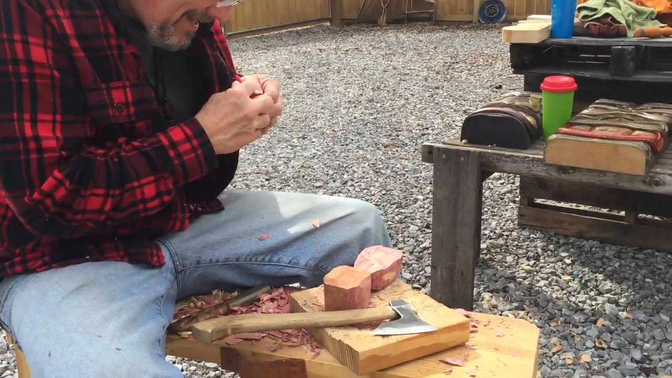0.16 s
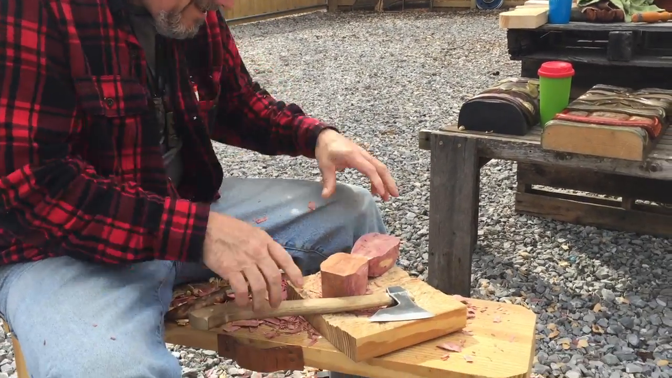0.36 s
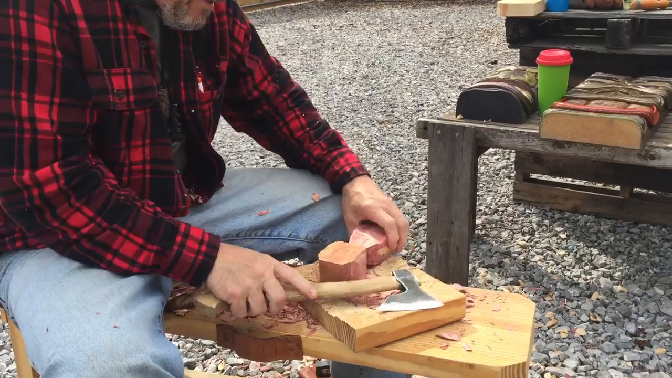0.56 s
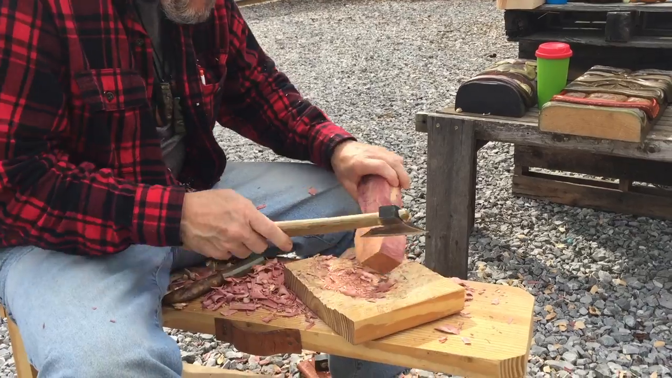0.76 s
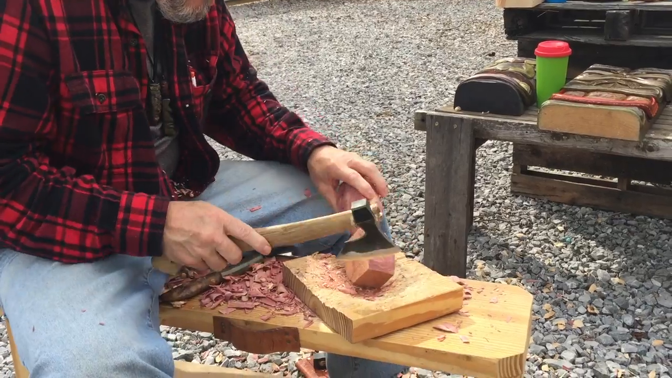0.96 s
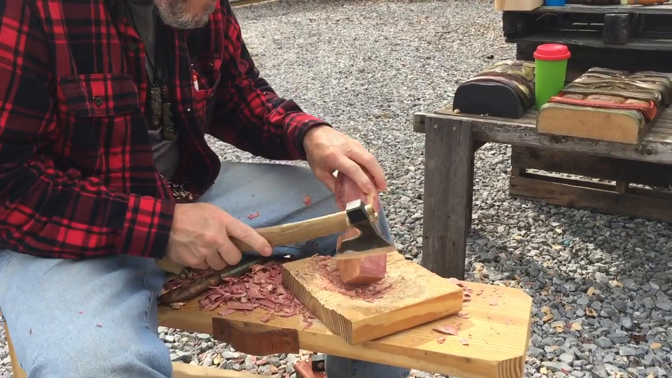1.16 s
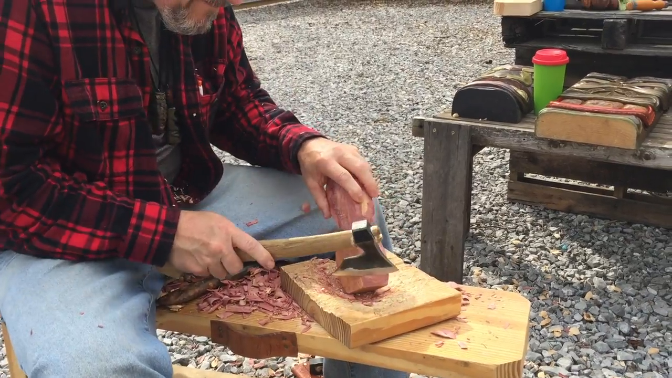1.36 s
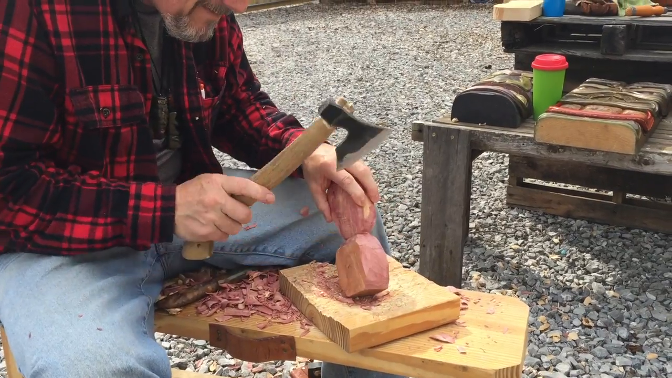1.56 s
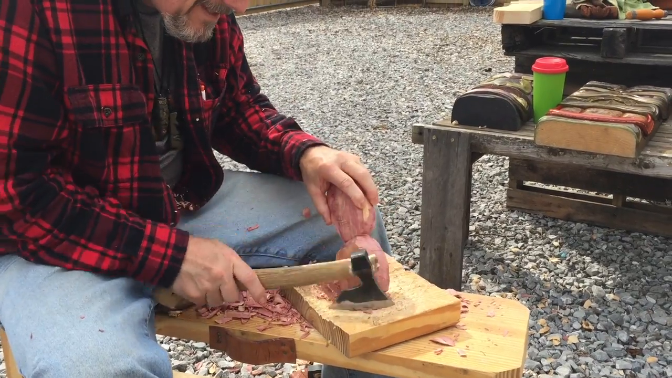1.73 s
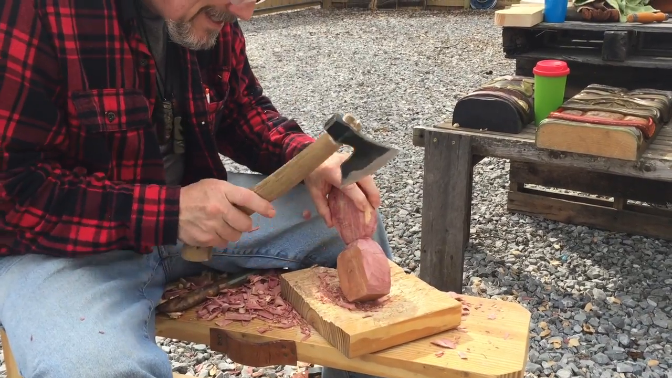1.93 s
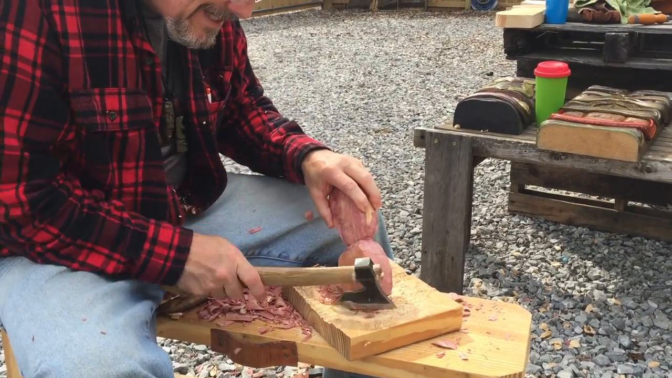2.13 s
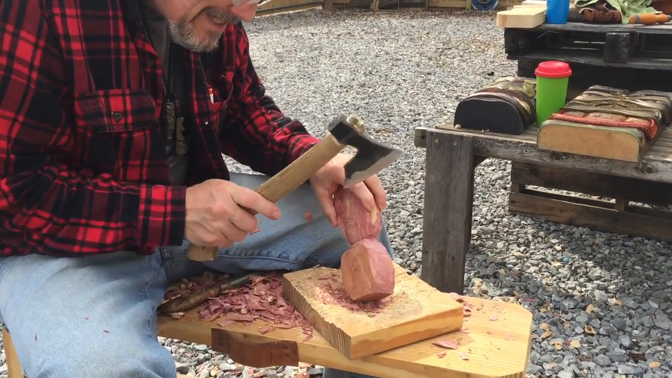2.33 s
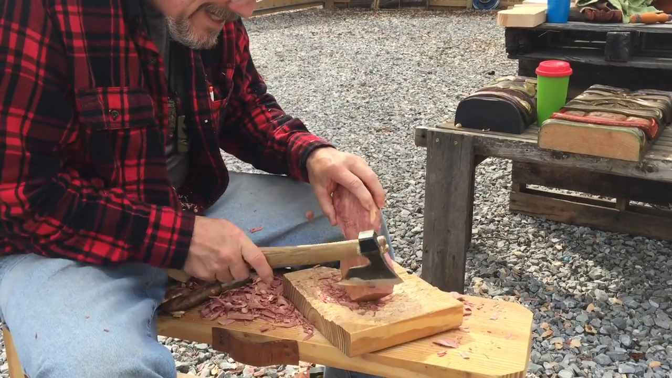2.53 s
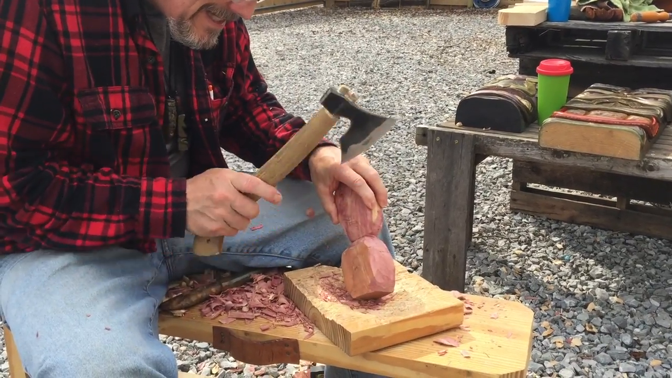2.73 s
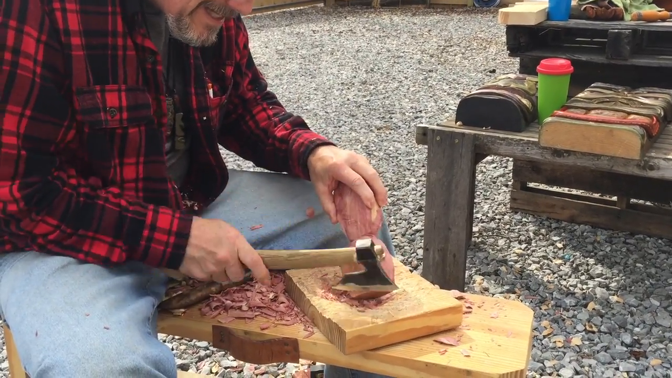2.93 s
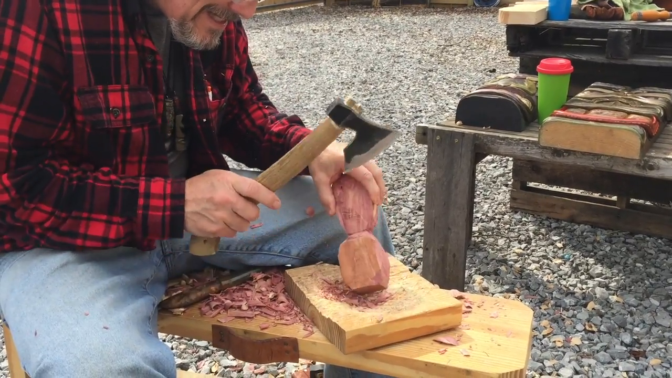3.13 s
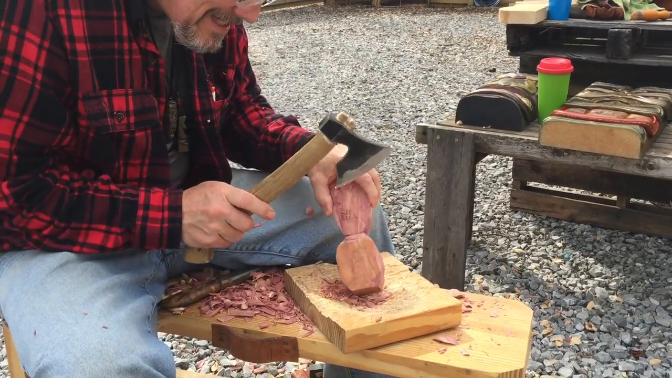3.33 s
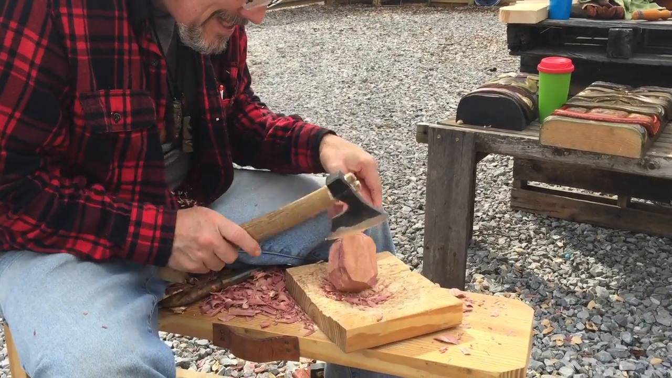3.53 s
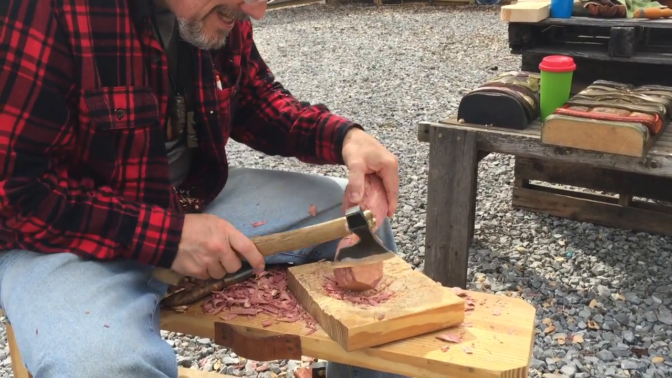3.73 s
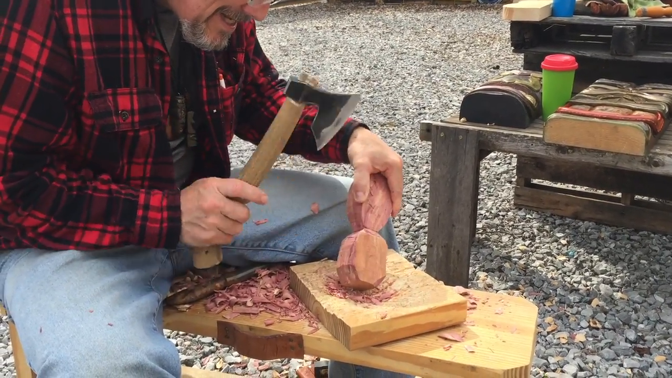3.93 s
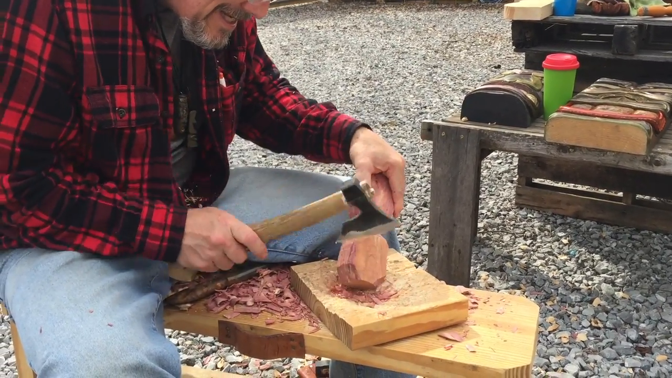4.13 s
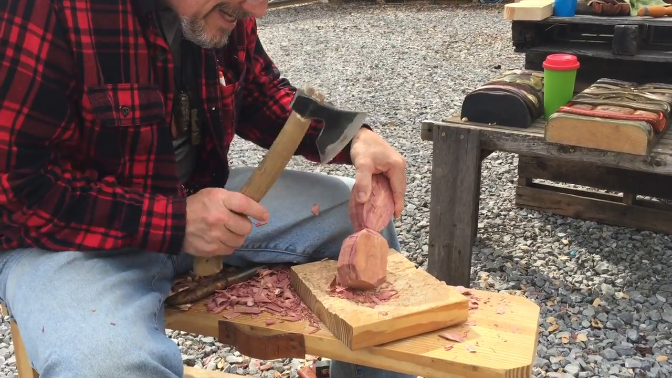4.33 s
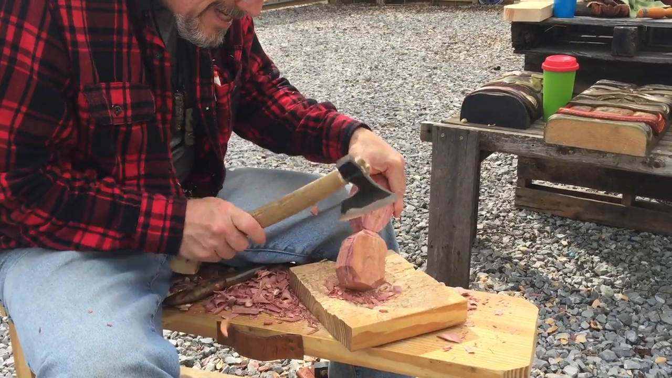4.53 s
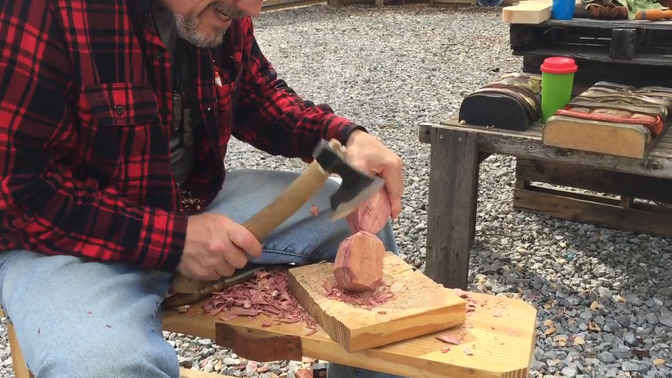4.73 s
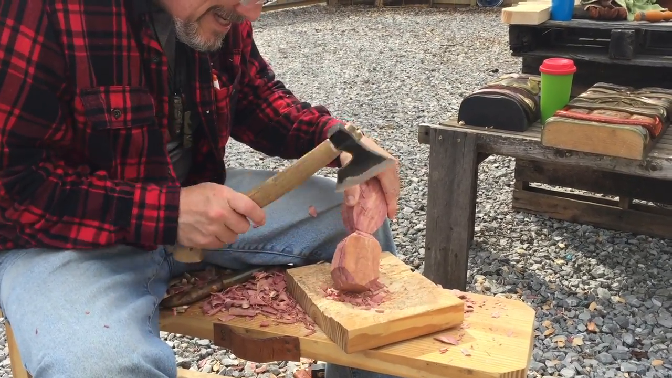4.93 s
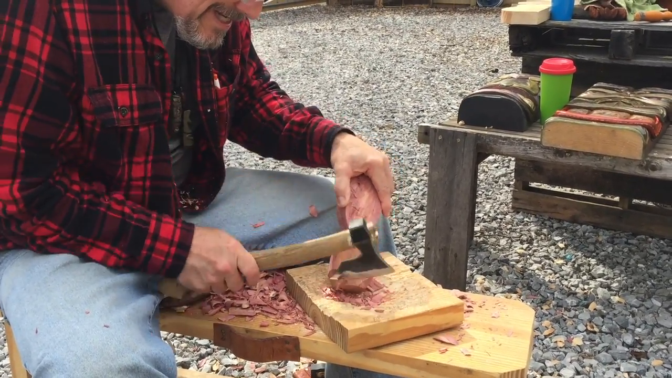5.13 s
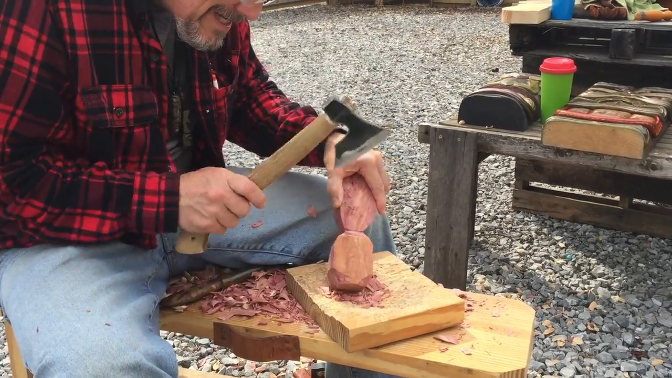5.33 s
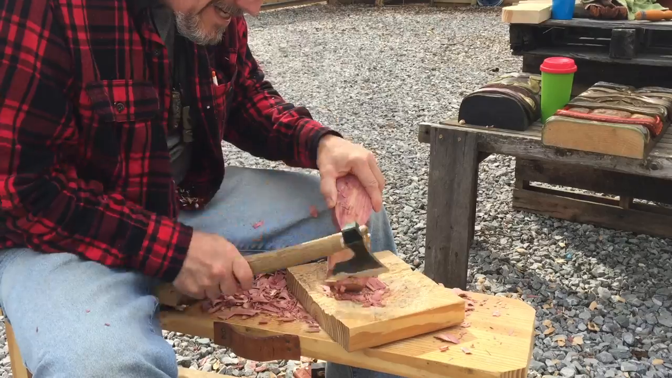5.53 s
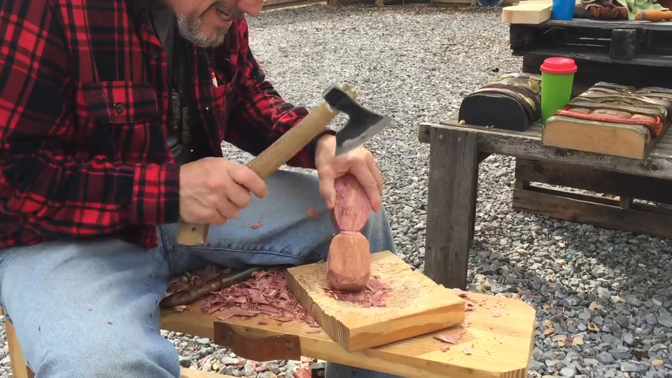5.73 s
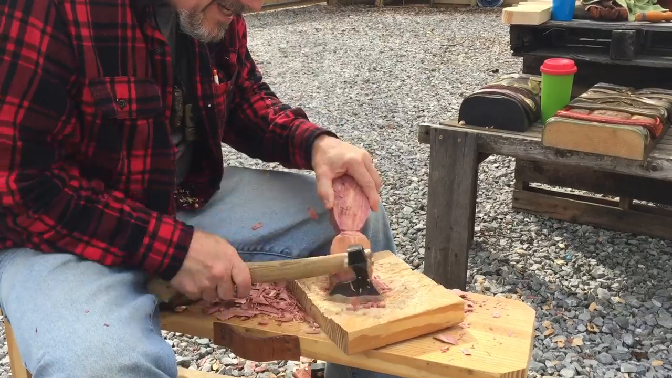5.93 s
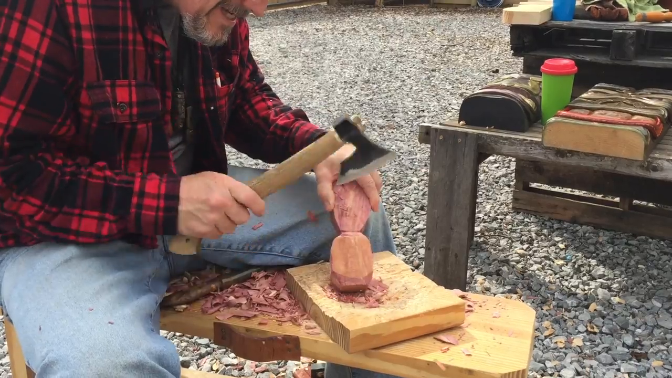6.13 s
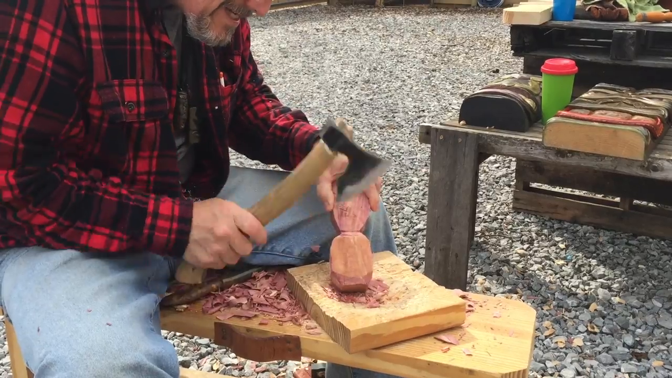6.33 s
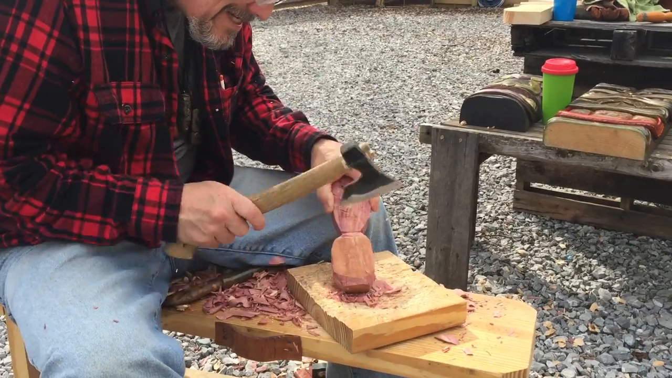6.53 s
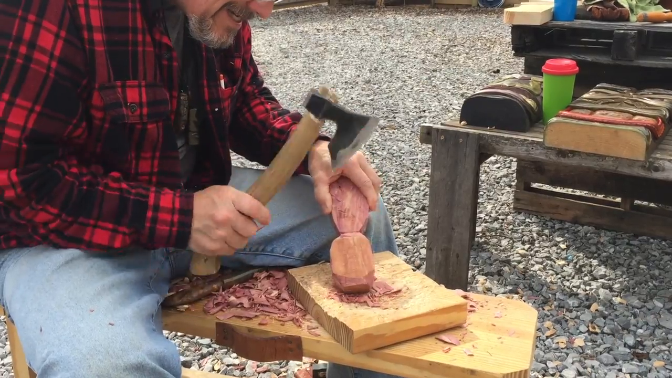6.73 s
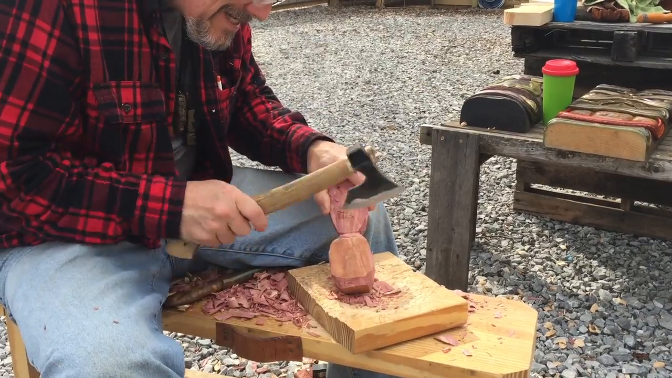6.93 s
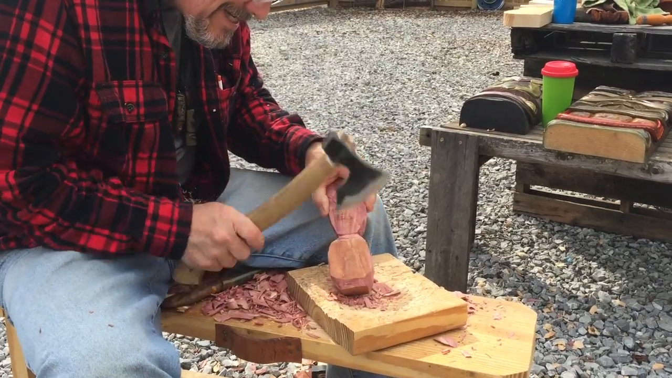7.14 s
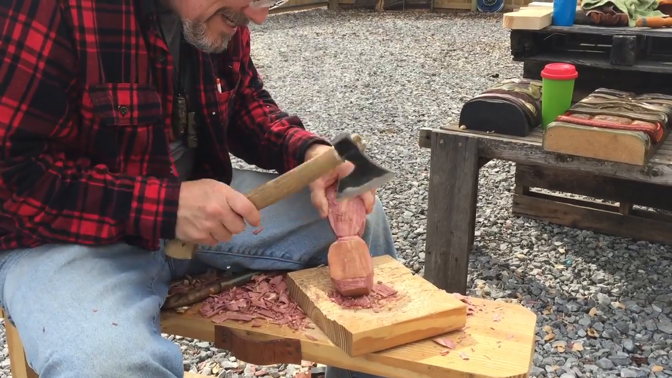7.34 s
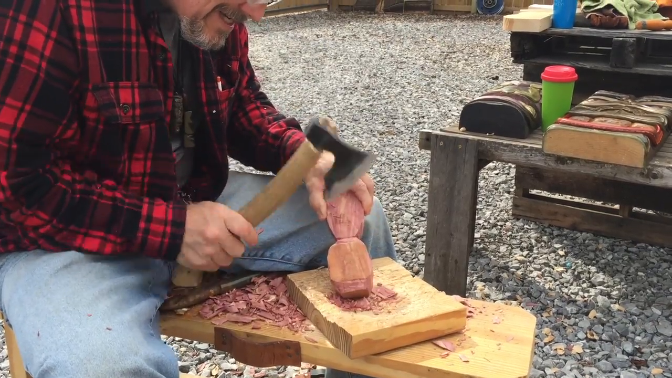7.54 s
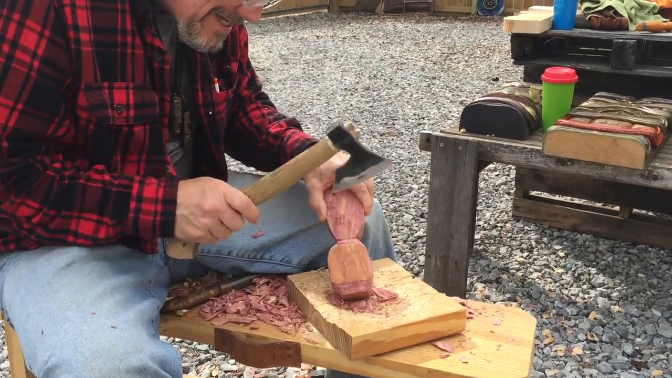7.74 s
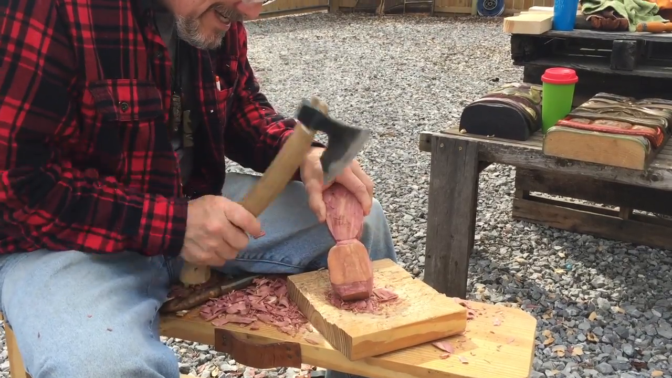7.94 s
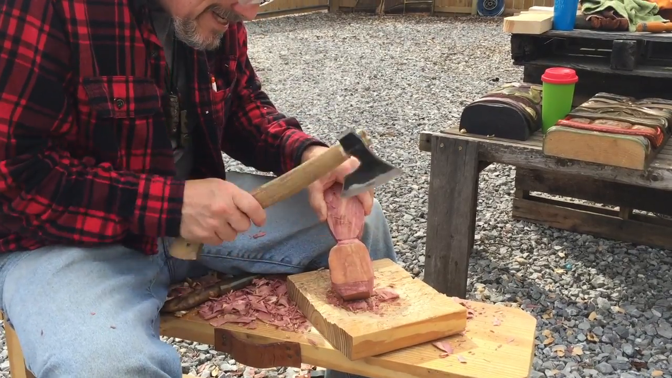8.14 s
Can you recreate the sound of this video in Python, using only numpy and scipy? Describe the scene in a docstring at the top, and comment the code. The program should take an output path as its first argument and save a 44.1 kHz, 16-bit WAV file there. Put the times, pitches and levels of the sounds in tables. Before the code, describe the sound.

After soft handling and rubbing of wood, light hatchet strokes fall in steady rhythm with woody cracks, dull board thumps and faint open-yard echoes.

```python
"""A hatchet chops a wooden blank that stands on a board across a bench, in a fenced gravel yard.
Each contact rings the blank's damped modes, tears fibres as a burst of noise and, a moment later,
thumps the board; the steel head rings briefly and the fences answer with smeared echoes.
Short puffs of noise tick and scuff, hands rub the wood as swelling noise, a far bird whistles in
gliding tones, and traffic rumbles in the distance under a faint hiss. The hardest blows clip."""
import sys
import numpy as np
from scipy import signal
from scipy.fft import rfft, irfft, next_fast_len
from scipy.io import wavfile
from scipy.ndimage import uniform_filter1d, map_coordinates

SR = 44100
rng = np.random.default_rng(int(sys.argv[2]) if len(sys.argv) > 2 else 0)


def convert_level_to_amplitude(level_db):
    """Map a level in decibels to its linear amplitude factor."""
    exponent = np.asarray(level_db, float) / 20
    return 10 ** exponent


def unload_wav(signal):
    """Save mono or channel-first audio to the path in sys.argv[1] as 16-bit WAV at rate SR, clipped to [-1, 1]."""
    wavfile.write(
        sys.argv[1],
        SR,
        np.round(np.clip(np.atleast_2d(signal).T, -1, 1) * 32767).astype(np.int16),
    )


N = 365148  # length of the scene in samples

# The chip being split off at each stroke lends a resonance, and the hatchet head rings; the set-downs have rows
# too. # Each row: time in seconds, chip resonance in Hz, its lift in dB, level of the steel ring in dB.
CHIPS = [(.954, 1490, 0.6, -75), (1.356, 3600, 5.5, -46), (1.844, 1554, 6, -23.5), (2.21, 4140, 4.5, -28),
         (2.589, 5516, 4.5, -37.5), (2.9824, 4583, 0, -18), (3.7671, 2100, 4, -40.5),
         (4.155, 2113, 2, -32.5), (4.5257, 3680, 2.5, -29.5), (4.896, 5460, 2, -21),
         (5.2739, 7010, 6, -39.5), (5.667, 2490, 4.5, -36.5), (6.0688, 2113, 4, -16.5),
         (6.5059, 1800, 2, -28), (6.9146, 2403, 10, -31.5), (7.2986, 2075, 10.5, -36.5),
         (7.7034, 2830, 4.5, -35.5), (8.109, 2343, 5, -39)]


def unit(x):
    """Brings x to rms 1."""
    return x / np.sqrt(np.mean(x ** 2) + 1e-20)


def along(points, hz):
    """Reads a curve of (Hz, value) points at any frequency, on a log axis."""
    f, value = np.transpose(points)[:2]
    return np.interp(np.log(hz + 1), np.log(f + 1), value)


def wobble(rate):
    """A smooth random curve with rate knots a second."""
    knots = rng.standard_normal(int(N * rate / SR) + 4)
    return map_coordinates(knots, [np.arange(N) * rate / SR])


def filtered(x, response):
    """Multiplies the spectrum of x by a response of frequency."""
    m = next_fast_len(len(x) + 8192)
    return irfft(rfft(x, m) * response(np.fft.rfftfreq(m, 1 / SR)), m)[:len(x)]


def noise(spectrum, size):
    """Coloured noise of rms 1."""
    return unit(filtered(rng.standard_normal(size), lambda hz: convert_level_to_amplitude(along(spectrum, hz))))


def dying(colour, decay, seconds, size):
    """Noise of energy 1 in which each frequency dies at its own speed."""
    hz, t, z = signal.stft(rng.standard_normal(round(SR * seconds)), SR, nperseg=size)
    level_db = along(colour, hz)[:, None] - 60 * t / along(decay, hz)[:, None]
    out = signal.istft(z * convert_level_to_amplitude(level_db), SR, nperseg=size)[1]
    return out / np.linalg.norm(out)


def patchy(x, depth_db):
    """Random gain in patches some hundred Hz by some ten ms, brought to rms 1."""
    z = signal.stft(x, nperseg=256)[2]
    field = uniform_filter1d(rng.standard_normal(z.shape), size=3, axis=0)
    field = uniform_filter1d(field, size=12, axis=1)
    return unit(signal.istft(z * convert_level_to_amplitude(depth_db * unit(field)), nperseg=256)[1][:len(x)])


def add(track, s, sound):
    """Mixes a sound in at second s."""
    part = track[round(s * SR):][:len(sound)]
    part += sound[:len(part)]


def tilted(rows, slope_db, pivot_hz):
    """Tilts rows (Hz, dB, ..) by slope_db an octave: a harder contact wakes the higher modes."""
    return [(hz, db + slope_db * np.log2(hz / pivot_hz), *rest) for hz, db, *rest in rows]


def ring(modes, t, scatter_db, cycles, detune):
    """Damped modes, new in strength and pitch each time; each takes some cycles to build up."""
    hz, db, t60 = np.transpose(modes)[:, :, None]
    chance = rng.standard_normal((2, len(modes), 1))
    build_up = 1 - np.exp(-(t * hz / cycles) ** 2)  # so the lows come late
    size = convert_level_to_amplitude(db + scatter_db * chance[0] - 60 * t / t60) * build_up
    return -np.sum(size * np.sin(2 * np.pi * hz * (1 + detune * chance[1]) * t), 0)


def chops():
    """Each contact: knock of the blank, burst of tearing fibres, late thump of the board."""
    # Contacts of the edge, often two to a stroke. Each row: time in seconds, then relative levels
    # of knock, thump and split in dB, and length of the split in ms.
    chop_rows = [(1.844, -18.5, -26.5, -31.5, 9), (1.8570, -4.5, -11, -32, 5.6),
                 (2.21, -10, -19.5, -16, 4.8), (2.2260, -14, -14.5, -32, 2.1),
                 (2.5890, -14.5, -15, -14.5, 3.5), (2.9825, -11, -8.5, -16.5, 2.2),
                 (2.9917, -7, -20.5, -24, 3.5), (4.1550, -18, -28.5, -26.5, 6.6),
                 (4.1660, -5, -11.5, -26.5, 2.2), (4.5262, -14, -13, -15.5, 5.5),
                 (4.8922, -13.5, -22, -21, 4.8), (4.8960, -29, -20.5, -18, 3), (4.906, -8, -13, -27.5, 2.7),
                 (5.2738, -10.5, -9.5, -15.5, 4), (5.6670, -2.5, -7.5, -11, 1.6),
                 (6.0686, -5, -6.5, -14, 2.3), (6.075, -7.5, -6.5, -30.5, 3.5),
                 (6.4994, -13.5, -14.5, -25.5, 6), (6.5059, 0, -7.5, -25, 4.8),
                 (6.9147, -6, -9.5, -14.5, 2.5), (7.2987, -4, -6.5, -17, 1.8),
                 (7.7034, -4.5, -5.5, -12, 1.1), (8.1090, -3, -5, -11.5, 1.2)]
    # Blank and hatchet are set down lightly; the columns are those of the chops.
    tap_rows = [(0.954, -27, -23, -57, 1.5), (1.355, -41, -34.5, -54.5, 5.54),
                (3.7669, -37.5, -38.5, -44.5, 8.2)]
    # Brightness of each contact in dB per octave: a longer cut is brighter.
    contacts = [(*row, -0.98 + 0.1857 * row[-1]) for row in chop_rows]
    contacts += [(*row, -3.5) for row in tap_rows]
    out, t = np.zeros(N), np.arange(SR // 8) / SR
    for s, knock_db, thump_db, split_db, split_ms, hard_db in contacts:
        wood = convert_level_to_amplitude(knock_db) * knock(t, hard_db) + convert_level_to_amplitude(split_db) * tearing(t, split_ms, hard_db)
        blow = chip(wood, s) + convert_level_to_amplitude(thump_db) * thump(t)
        add(out, s, blow)
        add(out, s, yard(blow))
    return out


def knock(t, hard_db):
    """A few clear modes of the wood, with a rattle of the dense small modes of bench and blank."""
    # Clear modes of blank and board. Each row: pitch in Hz, level in dB,
    # time to fall by 60 dB in seconds.
    wood_modes = [(616, -10.5, 0.019), (673, -2.5, 0.036), (780, -1.5, 0.033), (1212, 6, 0.017),
                  (1442, -7.5, 0.049), (1623, 2, 0.018), (2195, -3, 0.012), (2930, -7.5, 0.018),
                  (4000, -4.5, 0.01), (5770, -9.5, 0.017)]
    # Colour of the dense small modes. Each row: frequency in Hz, level in dB.
    body_colour = [(80, -13), (140, -1), (230, -8), (340, 0.5), (480, -6), (800, -4), (1500, -3),
                   (3000, -10), (7000, -26), (15000, -29.5)]
    # How fast they die. Each row: frequency in Hz, time to fall by 60 dB in seconds.
    body_decay = [(100, 0.36), (400, .08), (1500, 0.062), (5000, 0.04), (14000, 0.014)]
    rattle = dying(tilted(body_colour, hard_db, 800), body_decay, .13, size=128)[:len(t)]
    rattle *= 1 - np.exp(-t / 0.0008)  # soft start
    modes = ring(tilted(wood_modes, hard_db, 1000), t, scatter_db=4, cycles=0.91, detune=0.03)
    return convert_level_to_amplitude(-7) * modes + convert_level_to_amplitude(15.5) * rattle


def tearing(t, split_ms, hard_db):
    """Tearing grain: noise that rises in the first third of the cut, holds to its end and dies."""
    # Colour of tearing grain. Each row: frequency in Hz, level in dB per Hz.
    fibre_colour = [(880, -38), (1500, -22.5), (2130, -1.5), (2770, -12), (3850, 1.5), (5580, -5.5),
                    (10500, -14.5), (13600, -13), (15400, -17.5), (16500, -22.5)]
    seconds = split_ms / 1000
    shape = np.minimum(3 * t / seconds, 1) * convert_level_to_amplitude(-60 * np.maximum(t - seconds, 0) / 0.016)
    steps = np.repeat(rng.standard_normal(len(t) // 30 + 1), 30)[:len(t)]
    crackle = convert_level_to_amplitude(0.52 * steps)  # fibres give unevenly
    return shape * crackle * noise(tilted(fibre_colour, 2 * hard_db, 5000), size=len(t))


def thump(t):
    """The heavy board reaches its widest swing, near 230 Hz, some ms after the blow."""
    swing = t / .006
    return (swing * np.exp(1 - swing)) ** 5 * np.cos(2 * np.pi * 230 * (t - .0063))


def chip(x, s):
    """Lifts the sound around the resonance of the chip nearest in time."""
    _, hz, lift_db, _ = min(CHIPS, key=lambda row: abs(row[0] - s))
    width = .1 * hz

    def resonance(f):
        return 1j * f * width / (hz * hz - f * f + 1j * f * width)

    return filtered(x, lambda f: 1 + (convert_level_to_amplitude(lift_db) - 1) * resonance(f))


def head():
    """The steel head rings briefly at each stroke and each set-down, in two modes damped by the wood."""
    # Modes of the hatchet head. Each row: pitch in Hz, level in dB,
    # time to fall by 60 dB in seconds.
    steel_modes = [(3460, 0, .045), (8400, -16, .03)]
    out, t = np.zeros(N), np.arange(SR // 8) / SR
    for s, _, _, steel_db in CHIPS:
        level = convert_level_to_amplitude(steel_db + 3 * wobble(250)[:len(t)])
        ping = level * ring(steel_modes, t, scatter_db=1.5, cycles=3, detune=.006)
        add(out, s, ping)
        add(out, s, yard(ping))
    return out


def yard(x):
    """Near scatter, fence echoes and a long diffuse tail that builds up as farther fences join in."""
    # How long the yard rings. Each row: frequency in Hz, time to fall by 60 dB in seconds.
    yard_decay = [(150, 0.22), (500, 0.29), (1200, 0.64), (2400, 0.41), (4000, .55), (7000, 0.36),
                  (14000, 0.29)]
    # Colour of all that comes back. Each row: frequency in Hz, level in dB.
    yard_colour = [(150, -0.5), (500, 0.5), (1200, -3.5), (2400, 5), (4000, -4.5), (7000, 1), (14000, -3)]
    # Bench, table and gravel close by. Each row: frequency in Hz, time to fall by 60 dB in seconds.
    near_decay = [(200, 0.16), (2000, 0.045), (12000, 0.079)]
    # Echoes smeared by slats and posts. Each row: delay in seconds, level in dB,
    # time for the smear to fall by 60 dB in seconds.
    fence_echoes = [(.039, -34, .04), (.062, -32, 0.078)]
    flat = [(100, 0)]
    tail = convert_level_to_amplitude(-28) * dying(flat, yard_decay, .75, size=256)
    t = np.arange(len(tail)) / SR
    tail *= 1 - np.exp(-t / .03)
    add(tail, .008, convert_level_to_amplitude(-23) * dying(flat, near_decay, 0.27, size=128))
    for delay, db, t60 in fence_echoes:
        smear = convert_level_to_amplitude(-60 * t[:SR // 8] / t60)
        echo = rng.standard_normal(len(smear)) * smear / np.linalg.norm(smear)
        add(tail, delay, convert_level_to_amplitude(db) * echo)
    return filtered(signal.fftconvolve(x, tail), lambda f: convert_level_to_amplitude(along(yard_colour, f)))


def puffs(events, rise, t60):
    """Short dry puffs of noise around a centre pitch; rise and fall times in seconds."""
    out, t = np.zeros(N), np.arange(SR // 8) / SR
    for s, db, hz, octaves in events:
        band = lambda f: np.exp(-(np.log2((f + 1) / hz) / octaves) ** 2)
        puff = unit(filtered(rng.standard_normal(len(t)), band))
        add(out, s, convert_level_to_amplitude(db - 60 * t / t60) * (1 - np.exp(-(t / rise) ** 2)) * puff)
    return out


def ticks():
    """Short dry ticks: puffs with a sudden start and a quick fall, some just before a blow."""
    # Each row: time in seconds, level in dB before the rise and fall, centre in Hz,
    # bandwidth in octaves.
    tick_rows = [(0.2144, -54.5, 5300, 0.67), (0.5932, -58, 7900, .52), (0.6974, -64, 6230, .75),
                 (0.7747, -54, 6030, 1.1), (1.0287, -61, 6680, .8), (2.3686, -55.5, 7900, 1.2),
                 (2.7354, -60.5, 5430, 1.2), (3.2434, -62, 5220, 1.3), (3.4069, -44.5, 9800, 1.05),
                 (3.446, -61, 14000, 1.06), (3.5296, -55.5, 10800, 2.8), (3.5984, -50.5, 9520, 3.1),
                 (3.9635, -53.5, 5000, .8), (4.494, -48, 3190, .6), (4.506, -55.5, 5000, 1.1),
                 (4.517, -55, 4520, 1.2), (4.866, -49, 2974, 0.81), (5.0963, -56, 13140, .96),
                 (5.188, -57, 4800, 1.1), (5.225, -40.5, 6520, 2.5), (5.256, -41.5, 3210, 1.2),
                 (5.3462, -37, 5200, .91), (5.5177, -48, 5240, 1.1), (5.5324, -58.5, 8640, 0.96),
                 (5.643, -42.5, 5920, 1.3), (6.0067, -41.5, 4600, 1.4), (6.3925, -55.5, 13550, 1.23),
                 (6.3966, -54, 13070, 1.2), (6.4584, -55.5, 11690, 1.2), (6.4696, -42, 13190, 2.6),
                 (6.48, -44, 7940, 1.7), (6.892, -51, 2800, 1.3), (6.905, -50.5, 2990, 0.77),
                 (6.979, -44.5, 5980, 1.1), (7.277, -51.5, 1700, 0.97), (7.329, -43, 6500, 1.1),
                 (7.680, -49, 2600, 1.4), (8.087, -51, 2610, 1.3)]
    return puffs(tick_rows, rise=0.00045, t60=.017)


def scuffs():
    """Soft scuffs of skin and wood: puffs with a gentler start and a slower fall."""
    # Each row: time in seconds, level in dB before the rise and fall, centre in Hz,
    # bandwidth in octaves.
    scuff_rows = [(0.662, -48.5, 925, .4), (0.672, -50.5, 1150, .95), (0.7775, -48.5, 1020, 1),
                  (1.0024, -55.5, 1920, .4), (1.5914, -48.5, 3170, .31), (3.5424, -41, 2500, 0.42),
                  (3.724, -49.5, 2600, 0.44), (4.0023, -57, 1544, .29), (5.2374, -44, 2900, 0.63),
                  (5.468, -52, 1610, 0.26), (5.9603, -40.5, 2390, 0.45), (6.1424, -43, 3470, 0.23),
                  (7.252, -55.5, 3400, .4)]
    return puffs(scuff_rows, rise=.0073, t60=0.061)


def rubbing():
    """Skin, wood and cloth slide in uneven catches; each move swells and fades, crumbs crackle along."""
    # The hands move and turn the blank. Each row: start, rise and fall in seconds,
    # level of skin on wood in dB, level of cloth in dB.
    moves = [(.5, 0.14, 0.37, -74, -79), (.85, 0.12, 0.25, -69, -73.5), (.98, 0.21, .3, -64, -79),
             (1.25, .1, 0.086, -70, -74.5), (3.05, .09, 0.48, -66.5, -77), (3.4, 0.17, .12, -72, -73.5),
             (5.36, 0.023, 0.23, -87, -74.5)]
    # Colour of skin on wood. Each row: frequency in Hz, level in dB per Hz.
    rub_colour = [(650, -48), (1100, -38), (1250, 5.5), (1390, -13), (1810, 0.5), (2520, -22), (3600, -4.5),
                  (4790, -25), (7000, -22), (9100, -56), (15400, -120)]
    # Colour of cloth. Each row: frequency in Hz, level in dB per Hz.
    cloth_colour = [(2500, -19), (5000, 6.5), (10000, -2.5), (15500, -6), (16500, -21.5)]
    crumbs_per_s, crumb_db = 45, 3.5  # the level is the middle of the scatter, over the cloth
    t = np.arange(N) / SR
    shapes = [np.interp(t, [s, s + rise, s + rise + fall], [0, 1, 0]) ** 2 for s, rise, fall, *_ in moves]
    wood, cloth = convert_level_to_amplitude(np.array(moves)[:, 3:].T) @ shapes
    skin = convert_level_to_amplitude(2.4 * wobble(58)) * wood * patchy(noise(rub_colour, size=N), depth_db=2.0)
    starts = (rng.random(N) < crumbs_per_s / SR) * convert_level_to_amplitude(crumb_db + 4.7 * rng.standard_normal(N))
    crumbs = signal.fftconvolve(starts, convert_level_to_amplitude(-60 * t[:SR // 20] / .017))[:N]
    return skin + (convert_level_to_amplitude(2.4 * wobble(90)) + crumbs) * cloth * noise(cloth_colour, size=N)


def bird():
    """Thin far whistles, slightly unsteady, that slide in pitch, swell and stop short."""
    # Each row: start and length in seconds, first and last pitch in Hz, level in dB at the loudest.
    whistles = [(.07, 0.086, 4400, 4340, -82), (.37, 0.094, 3750, 3780, -79), (.85, 0.103, 4150, 4290, -74),
                (5.078, .07, 3860, 3870, -70), (5.14, 0.091, 3860, 3845, -72),
                (7.427, .135, 3760, 3620, -54.5), (7.97, .11, 4000, 4040, -75)]
    scoop_hz, scoop_s = 190, .022  # each whistle starts high and drops onto its pitch
    swell_db = 13.5  # it grows to its end
    echo_s, echo_db = .11, -21  # a wall returns it
    out = np.zeros(N)
    for s, length, first_hz, last_hz, db in whistles:
        u = np.linspace(0, 1, round(length * SR))
        hz = first_hz + (last_hz - first_hz) * u
        hz += scoop_hz * np.exp(-u * length / scoop_s) + 45 * wobble(32)[:len(u)]
        edges = np.minimum(np.minimum(u, 1 - u) * length / .006, 1)
        level = edges * convert_level_to_amplitude(db - swell_db * (1 - u) + 1.9 * wobble(68)[:len(u)])
        call = np.sqrt(2) * level * np.sin(2 * np.pi * np.cumsum(hz) / SR)  # the root makes db an rms
        add(out, s, call)
        add(out, s + echo_s, convert_level_to_amplitude(echo_db) * call)
    return out


def traffic():
    """Distant traffic: low noise that swells and sinks."""
    # Loudness over time. Each row: time in seconds, level in dB.
    traffic_level = [(0.0, -47.5), (0.3, -44), (0.9, -44.5), (1.75, -46.5), (2.119, -48), (2.44, -42.5),
                     (2.6, -47), (3.15, -48.5), (3.3, -41.5), (3.45, -45.5), (4.2, -46), (4.9, -47.5),
                     (5.44, -44.5), (6.1, -47), (6.45, -45), (6.68, -51.5), (7.31, -44), (7.95, -48.5),
                     (8.28, -45)]
    # Colour of the rumble. Each row: frequency in Hz, level in dB per Hz.
    rumble_colour = [(12, -44), (20, -21), (80, 0.5), (140, -10), (198, -17), (248, -21), (282, -44.5),
                     (400, -40.5), (520, -75), (880, -120)]
    level_db = np.interp(np.arange(N) / SR, *np.transpose(traffic_level))
    return convert_level_to_amplitude(level_db + 0.67 * wobble(22.0)) * noise(rumble_colour, size=N)


def air():
    """A faint outdoor hiss: noise, uneven in time and pitch."""
    # Colour of the hiss. Each row: frequency in Hz, level in dB per Hz.
    air_colour = [(150, -29), (250, -4), (410, -15.5), (840, -19.5), (1720, -24.5), (3800, -28.5),
                  (5000, -36), (13600, -43), (16500, -54)]
    return convert_level_to_amplitude(-66.5 + wobble(1.5)) * patchy(noise(air_colour, size=N), depth_db=1.0)


def scene():
    """All sources at one microphone."""
    work = chops() + head() + ticks() + scuffs() + rubbing()
    return (work + bird() + traffic() + air())[None]


def low_pass(x):
    """Removes everything above the highest recorded frequency."""
    return signal.sosfilt(signal.butter(12, 17160, fs=SR, output="sos"), x)


def record(dry):
    """The input stage clips the hardest blows; then a bass cut, a treble lift and the band limit."""
    clipped = dry[0] / (1 + np.abs(dry[0] / 0.67) ** 5) ** (1 / 5)

    def colour(hz):
        bass_cut = hz ** 2 / (hz ** 2 + 45 ** 2)
        treble_lift = 1 + .5 * (hz / 12000) ** 2
        return treble_lift * bass_cut / (1 + (hz / 16500) ** 90)

    return low_pass(filtered(clipped, colour)[None])


dry = scene()
out = record(dry)
unload_wav(out)
```